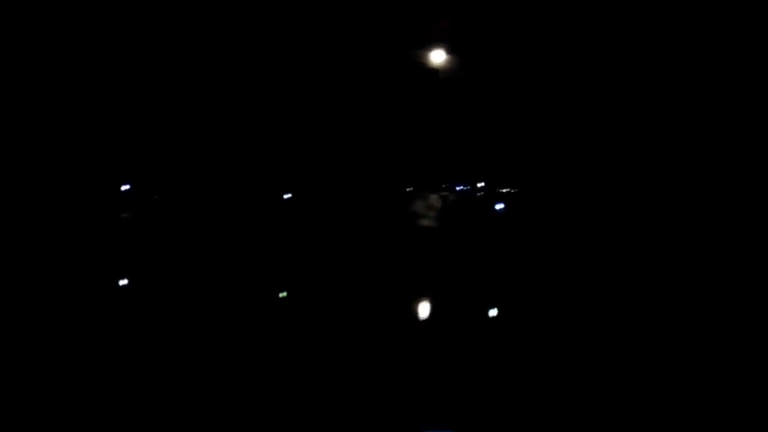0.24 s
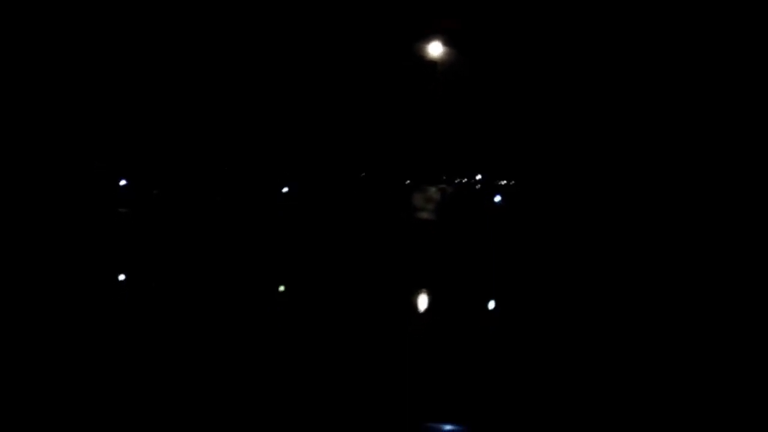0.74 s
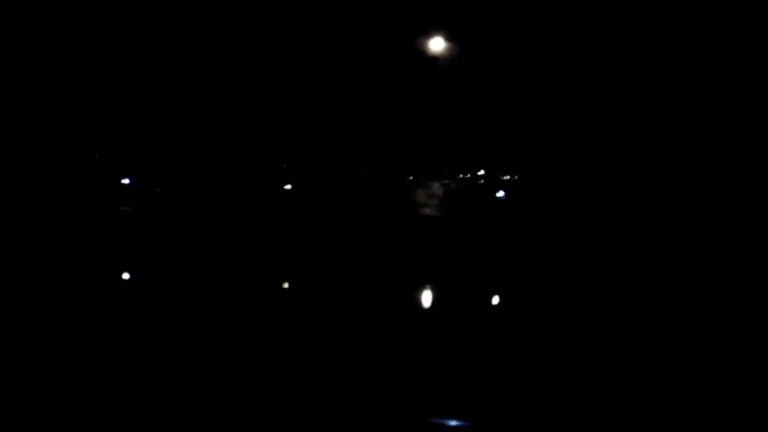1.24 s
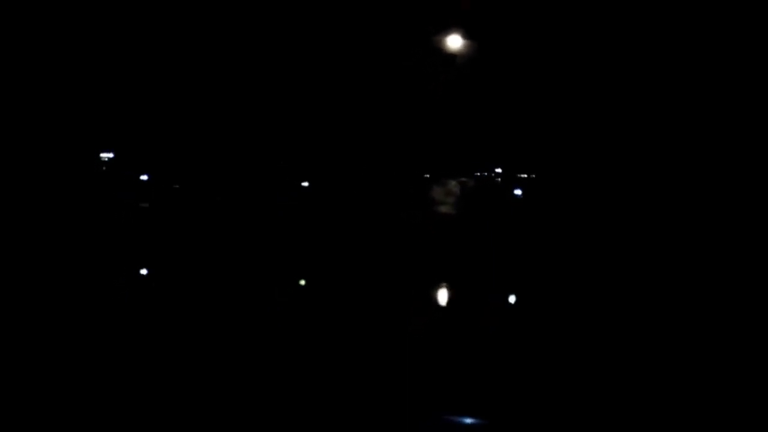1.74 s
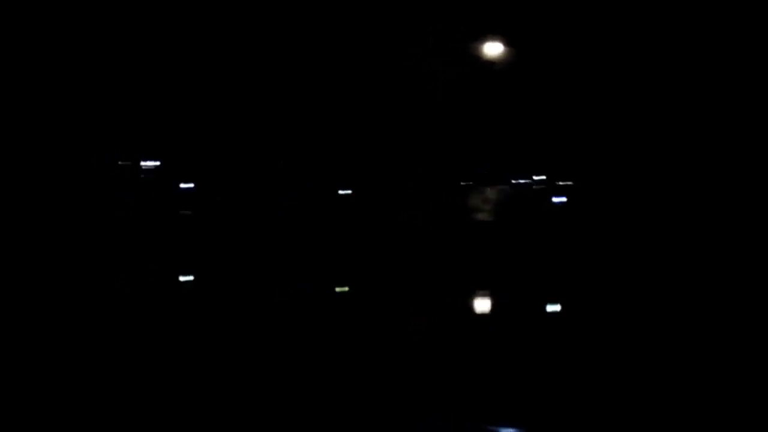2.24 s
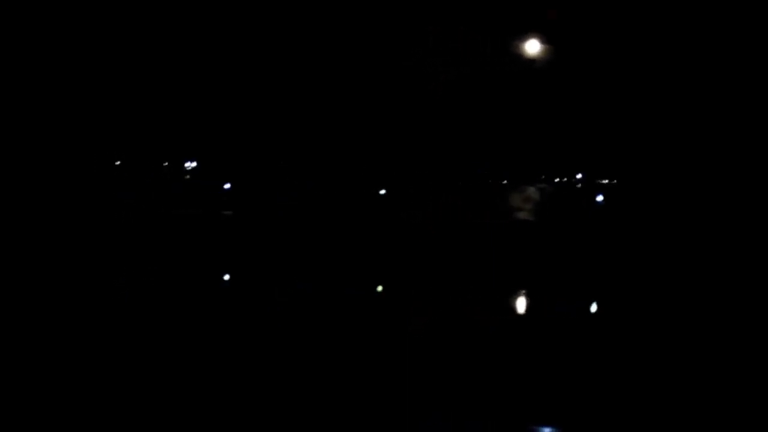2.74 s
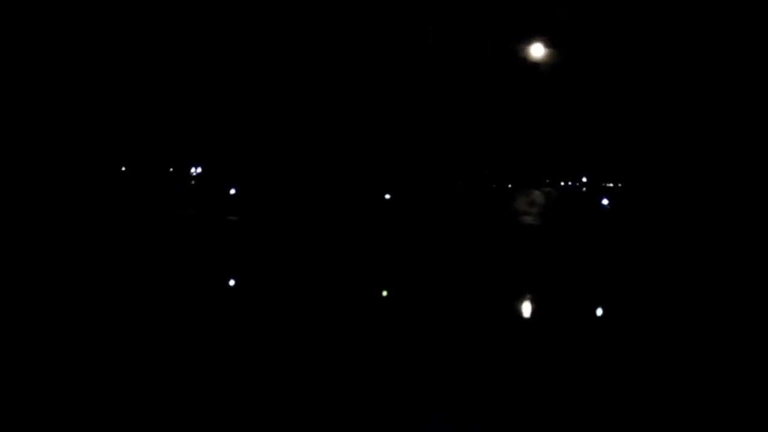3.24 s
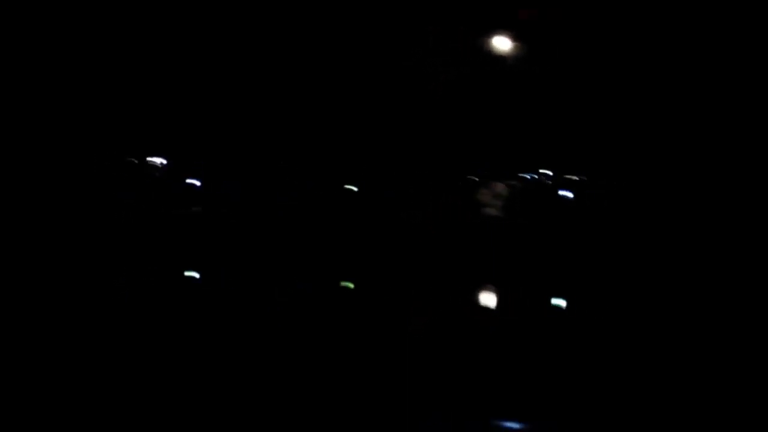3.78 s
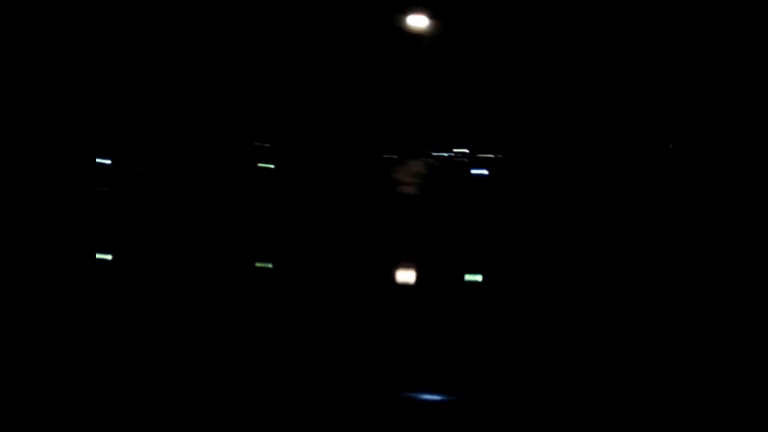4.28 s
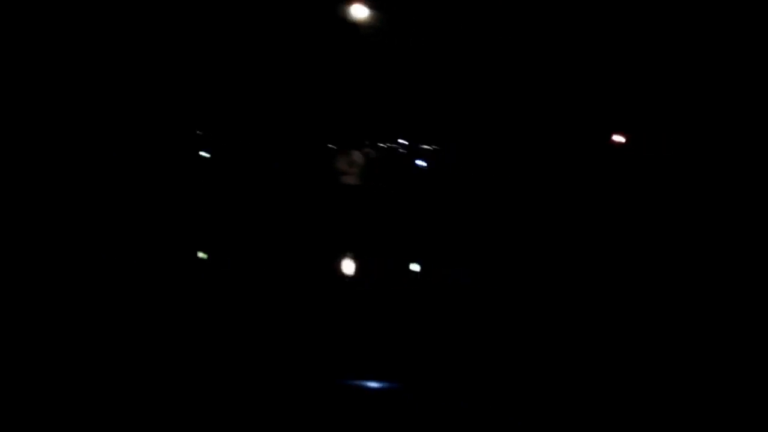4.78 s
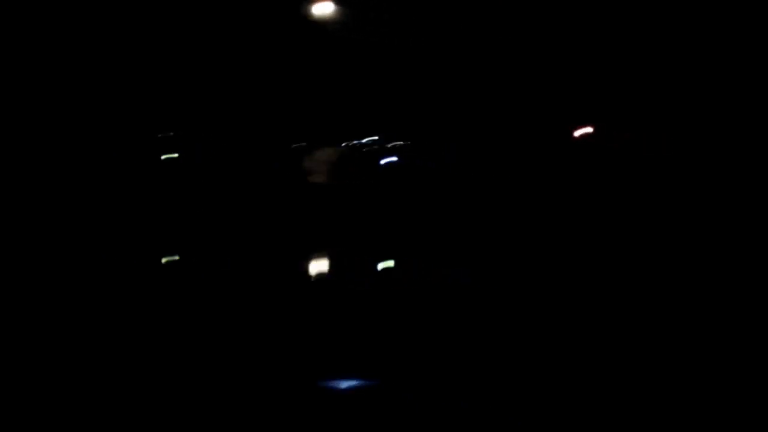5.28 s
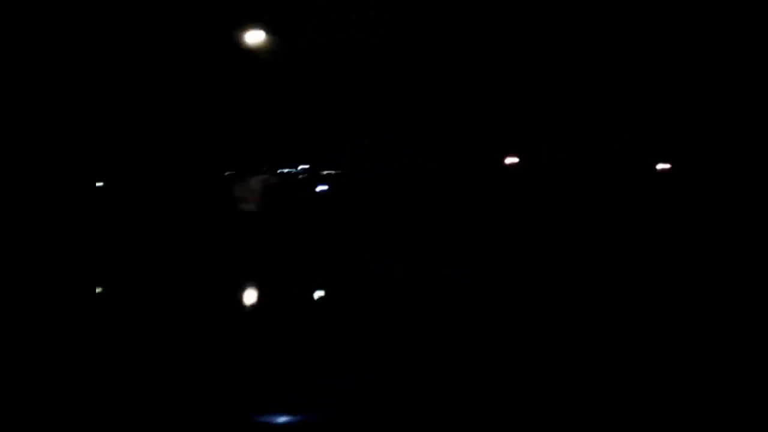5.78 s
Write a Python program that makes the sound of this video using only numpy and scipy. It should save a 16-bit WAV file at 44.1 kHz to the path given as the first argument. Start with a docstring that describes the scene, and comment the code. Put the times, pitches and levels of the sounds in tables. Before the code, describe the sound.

A colony of waterbirds, probably gulls, chatters continuously across open water at night, hundreds of short, high cries overlapping with a brief echo off the shore. For the first second or so the flock is fairly calm, with soft whimpers and mews. Thin squeals and shrill wails stand out from about 1.2 seconds, and hooked yelps join at 1.6. From about 2.5 to 4 seconds the chatter swells, full of quick rising yips and yelps. It eases for a moment around 4.2 seconds, then returns louder, with raspy squawks and sharp cries squabbling until the end at about 6 seconds. Two very faint low hoots lie beneath, near 1.4 and 3.2 seconds. Throughout there is the faint low rumble of a far town and the thin hiss and very high sizzle of a mono microphone.

```python
"""Waterbirds squabbling at night

A colony, probably gulls, chatters across open water and grows more excited. Single shrill, raspy
cries stand out, and the shore smears them with echoes. Each cry is a bending, shaking tone made of
four partials (1, 2, 3 and 4 times its pitch). Beneath lie faint hoots, the low rumble of a far town
and the thin hiss of a mono microphone."""
import sys
import numpy as np
from scipy import signal
from scipy.fft import rfft, irfft, next_fast_len
from scipy.io import wavfile

SR = 44100
rng = np.random.default_rng(int(sys.argv[2]) if len(sys.argv) > 2 else 0)


def dump(signal):
    """Clip the signal to [-1, 1] and save it as 16-bit WAV at the path in sys.argv[1]."""
    limited = np.clip(np.atleast_2d(signal).T, -1, 1)
    pcm = np.round(limited * 32767).astype(np.int16)
    wavfile.write(sys.argv[1], SR, pcm)


N = 265393
TIME = np.arange(N) / SR


def gain_of(db):
    """Turns decibels into a number to multiply a sound by."""
    return 10 ** (np.asarray(db) / 20)


def evened(x):
    """Scales a signal to an average strength (rms) of 1."""
    return x / np.sqrt(np.mean(abs(x) ** 2) + 1e-20)


def value_at(points, hz):
    """Reads between the rows of a (frequency, value) table, giving each octave equal room."""
    known_hz, values = np.transpose(points)
    return np.interp(np.log(hz + 1), np.log(known_hz + 1), values)


def add(mix, start_s, sound):
    """Adds a sound to the mix, dropping what sticks out at either end."""
    start = round(start_s * SR)
    sound = sound[..., max(-start, 0):]
    part = mix[..., max(start, 0):][..., :sound.shape[-1]]
    part += sound[..., :part.shape[-1]]


def wander(size, rate_hz):
    """A random wobble of strength 1, no faster than about rate_hz."""
    padded = next_fast_len(size + 2048)
    hz = np.fft.rfftfreq(padded, 1 / SR)
    keep_slow = np.exp(-.5 * (hz / rate_hz) ** 2)
    return evened(irfft(rfft(rng.standard_normal(padded)) * keep_slow, padded))[:size]


def coloured(x, spectrum):
    """Turns each frequency up or down by the decibels in a table."""
    padded = next_fast_len(N + 2048)
    gain = gain_of(value_at(spectrum, np.fft.rfftfreq(padded, 1 / SR)))
    return irfft(rfft(x, padded) * gain, padded)[:N]


def noise(spectrum):
    """Steady noise of strength 1, shaped by a table."""
    return evened(coloured(rng.standard_normal(N), spectrum))


def low_notes(rows, waver):
    """Soft low notes that swell and fade, their pitch a little unsteady."""
    out = np.zeros(N)
    for start_s, length_s, hz, db in rows:
        size = int(length_s * SR)
        phase = 2 * np.pi * np.cumsum(hz * (1 + waver * wander(size, 40))) / SR
        add(out, start_s, gain_of(db) * evened(np.hanning(size) * np.sin(phase)))
    return out


def cry(length_s, top_hz, scoop, drop, top_at, rasp, waver):
    """One bird's cry as four partials: the pitch rises, then falls, and rasp (0 to 1) roughens it."""
    # scoop and drop: how far below top_hz it starts and ends, as shares of that pitch
    # top_at: how far through the cry the pitch is highest; waver: the size of its slow wobble
    size = int(max(length_s, .03) * SR)
    progress = np.linspace(0, 1, size)
    roughness = np.sqrt(np.clip(rasp * (1 + .87 * (progress - .5)), 0, 1))  # the voice breaks at the end
    top_at = np.clip(top_at, .05, .95)
    rise = scoop * (1 - progress / top_at) ** 2
    fall = drop * ((progress - top_at).clip(0) / (1 - top_at)) ** 1.4
    hz = top_hz * (1 - np.where(progress < top_at, rise, fall))
    hz *= 1 + waver * wander(size, 45.4) + .026 * roughness * wander(size, 334)
    flutter = 1 + .26 * wander(size, 54)
    rattle = 1 + .91 * roughness * wander(size, 354)
    loudness = np.sin(np.pi * progress).clip(0) ** .27 * evened(flutter * rattle)
    phase = 2 * np.pi * (np.cumsum(hz) / SR + rng.random())
    return np.sqrt(2) * loudness * np.sin(np.arange(1, 5)[:, None] * phase)


def calls(rows, top_at, rasp, waver, partials_db):
    """Plays a table of cries in one kind of voice; each row's level is relative to the others."""
    out = np.zeros(N)
    for start_s, length_s, top_hz, scoop, drop, db in rows:
        partials = cry(length_s, top_hz, scoop, drop, top_at, rasp, waver)
        add(out, start_s, gain_of(db + np.array(partials_db)) @ partials)
    return out


def with_neighbours(rows, within_s=.05, pitch_spread=.06, fainter_db=10.5):
    """Each cry sets off two neighbours, a little later, fainter and at their own pitch."""
    replies = []
    for start_s, length_s, top_hz, scoop, drop, db in rows:
        for late, voice in rng.random((2, 2)):
            hz = top_hz * (1 + pitch_spread * (2 * voice - 1))
            replies.append((start_s + within_s * late, length_s, hz, scoop, drop, db - fainter_db))
    return list(rows) + replies


# The tone of the far town: frequency_hz, relative_db
RUMBLE_SPECTRUM = [(15, -2), (28, -19), (45, -8), (65, -1), (100, -0.5), (150, -2), (230, -1), (400, -4.5),
                   (700, -6), (1150, -6.5), (1600, -27), (2500, -56)]

def town_rumble():
    """A far town: low noise that heaves gently."""
    return gain_of(-61 + wander(N, 10.5)) * noise(RUMBLE_SPECTRUM)


# Soft swells of the town's drone: start_s, length_s, pitch_hz, level_db
DRONE_SWELLS = [(-.03, .16, 149, -62.5), (-.1, .5, 65, -71), (2.6, 1.4, 81, -72.5),
                (4.27, 0.15, 135.8, -65.5), (5.12, 0.13, 131, -65.5), (5.42, 0.13, 143.7, -62),
                (5.6, 0.23, 129.5, -64.5)]

def town_drone(level_db=-70, centre_hz=136, width_hz=22, heave_db=2.5):
    """A narrow band of distant rumble that heaves at random and now and then swells."""
    wobble = wander(N, width_hz) + 1j * wander(N, width_hz)
    band = evened((wobble * np.exp(2j * np.pi * centre_hz * TIME)).real)  # moved up to centre_hz
    return gain_of(level_db + heave_db * wander(N, 3.3)) * band + low_notes(DRONE_SWELLS, waver=.027)


# The tone of the hiss: frequency_hz, relative_db
HISS_SPECTRUM = [(800, -16.5), (1200, -13), (3000, -19), (8000, -15), (11500, -17.5), (13900, -15),
                 (16000, -9.5)]

def microphone_hiss():
    """The microphone's own thin, steady noise."""
    return gain_of(-56) * noise(HISS_SPECTRUM)


# The tone of the sizzle: frequency_hz, relative_db
SIZZLE_SPECTRUM = [(12500, -49), (13900, -22), (14500, -4), (15150, 8), (15900, -6), (16500, -20)]
# Faint electrical tones: pitch_hz, level_db
WHINE_TONES = [(6448, -71), (12897, -82)]

def microphone_sizzle():
    """A very high, fluttering sizzle with a steady electrical whine."""
    sizzle = gain_of(-53 + 1.5 * wander(N, 17)) * noise(SIZZLE_SPECTRUM)
    whine = sum(gain_of(db) * evened(np.sin(2 * np.pi * hz * TIME)) for hz, db in WHINE_TONES)
    return sizzle + whine


# The tone of the farthest birds: frequency_hz, relative_db
FAR_BIRD_SPECTRUM = [(900, -33), (1250, -11), (1750, 7.5), (2300, 8.5), (2700, -2), (3300, -29),
                     (3900, -23), (4500, 2.5), (5000, -8.5), (5700, 4), (6600, 4.5), (7400, 0),
                     (8500, -7.5)]

def far_birds():
    """Birds so far off that they blur into a flickering wash of noise."""
    return gain_of(-55 + 2.07 * wander(N, 17)) * noise(FAR_BIRD_SPECTRUM)


# The range of voices in the crowd: share_of_birds_lower, pitch_hz
CROWD_PITCHES = [(0, 1208), (.1, 1352), (.35, 1494), (.6, 1697), (.85, 1858), (1, 2175)]
# How excited the crowd is: time_s, above_calm_db
CROWD_EXCITEMENT = [(0, -1), (1.2, -0.1), (1.9, 1), (2.7, 5), (3.9, 5), (4.22, -2), (4.45, 6.5),
                    (4.62, 6.5), (4.8, 8), (5.3, 5), (6.02, 8)]

def crowd(count=420, spread_db=3, calm_db=(-57, -57, -57, -63.5), follow=(1, .92, .19, .21)):
    """Hundreds of overlapping cries; each partial rises from calm by its own share of the excitement."""
    partials = np.zeros((4, N))
    for k, (when, voice, length, near, rasp, top_at) in enumerate(rng.random((count, 6))):
        hz = np.interp(voice, *np.transpose(CROWD_PITCHES))
        sound = cry(.05 + .11 * length, hz, scoop=.08 * top_at, drop=.11 * (1 - top_at),
                    top_at=top_at, rasp=.73 * rasp, waver=.0091)
        start_s = (k + when) / count * (TIME[-1] + .15) - .15  # already calling as the scene opens
        add(partials, start_s, gain_of(spread_db * (2 * near - 1)) * sound)
    excitement_db = np.interp(TIME, *np.transpose(CROWD_EXCITEMENT))
    return sum(gain_of(db + share * excitement_db) * evened(partial)
               for db, share, partial in zip(calm_db, follow, partials))


# Mellow cries: start_s, length_s, top_pitch_hz, scoop_share, drop_share, level_db, rasp_0_to_1
MEW_CRIES = [(-.04, 0.068, 1683, .01, 0.055, -59, 0.24), (.2, 0.17, 1840, .013, .046, -55.5, .25),
             (1.193, 0.087, 1298, 0.027, .02, -50, 0.1), (1.769, .14, 1905, 0.025, 0.053, -58.5, 0.5),
             (2.03, .11, 2090, .024, 0.063, -54, .4), (2.136, 0.058, 1494, .012, .029, -55, 0.16),
             (2.35, 0.049, 1510, .01, .04, -54.5, 0.4), (2.638, .065, 1934, .025, 0.062, -49.5, .5),
             (2.69, .039, 1543, .018, 0.032, -50, 0.3), (3.044, 0.14, 2016, .016, 0.045, -55, 0.4),
             (3.17, .15, 1674, .01, 0.051, -53.5, .2), (3.34, 0.11, 1478, .011, .025, -54, 0.1),
             (3.601, .21, 1724, 0.016, .025, -50.5, 0.31), (3.791, .16, 1562, .008, 0.017, -51.5, 0.12),
             (3.945, .12, 1976, 0.063, .083, -50.5, 0.35), (4.38, .054, 1519, .023, .034, -56, 0.6),
             (4.62, 0.12, 1850, 0.014, 0.064, -47, .8), (4.651, 0.11, 1566, 0.012, 0.037, -55, 1),
             (4.681, .094, 2076, .023, 0.052, -54, .9), (4.92, .13, 1786, .014, .059, -50, 1),
             (5.217, .15, 1615, 0.026, .039, -49.5, 0.44), (5.35, 0.083, 1555, .012, .096, -48.5, 0.34),
             (5.67, 0.13, 2044, .073, .053, -54, 0.6), (5.761, 0.064, 1768, .008, 0.06, -51, .6)]

def mews():
    """Mews, strongest in the lowest partial; the later ones tend to be hoarser."""
    return sum(calls([row], top_at=.304, rasp=rasp, waver=.008, partials_db=(1.5, -34, -16, -15))
               for *row, rasp in MEW_CRIES)


# Soft cries: start_s, length_s, top_pitch_hz, scoop_share, drop_share, level_db
WHIMPER_CRIES = [(.205, 0.069, 1253, .004, 0.042, -56), (.27, 0.068, 1195, .003, .02, -55),
                 (.32, 0.066, 1175, 0.003, 0.01, -49.5), (.63, 0.077, 1200, 0.017, .03, -62),
                 (.89, 0.049, 1405, 0.025, 0.03, -58), (.97, 0.084, 1245, .01, 0.074, -61)]

def whimpers():
    """Smooth whimpers that peak early and then sink."""
    return calls(WHIMPER_CRIES, top_at=.24, rasp=.02, waver=.0035, partials_db=(-9, 2, -18, -31))


# Brief dips in the background: middle_s, half_length_s, depth_db
BACKGROUND_DIPS = [(.332, 0.013, -13), (1.448, 0.018, -24), (5.834, 0.02, -26)]

def dips():
    """A volume curve that sinks for an instant now and then."""
    return gain_of(sum(db * np.exp(-((TIME - middle_s) / half_s) ** 4)
                       for middle_s, half_s, db in BACKGROUND_DIPS))


# Thin cries: start_s, length_s, top_pitch_hz, scoop_share, drop_share, level_db
SQUEAL_CRIES = [(.75, 0.18, 1910, 0.028, 0.022, -63), (.86, 0.16, 1490, 0.0185, 0.043, -64),
                (1.25, 0.092, 1815, .02, .05, -56), (1.53, .1, 1777, .01, 0.072, -56),
                (1.62, 0.05, 1570, 0.023, 0.043, -55.5), (3.59, 0.064, 1826, 0.014, 0.016, -55),
                (3.8, 0.15, 1846, 0.022, 0.021, -57), (4.05, 0.073, 1530, 0.023, 0.075, -55),
                (4.3, 0.11, 1830, 0.0203, 0.054, -54.5), (4.85, 0.069, 1693, 0.053, .01, -52),
                (4.92, 0.11, 1860, 0.11, 0.035, -57), (5.1, 0.12, 1840, .05, 0.056, -55)]

def squeals():
    """Thin squeals, strongest in the third partial."""
    return calls(SQUEAL_CRIES, top_at=.47, rasp=.15, waver=.0094, partials_db=(-6, -11, 0, -22))


# Shrill cries: start_s, length_s, top_pitch_hz, scoop_share, drop_share, level_db
WAIL_CRIES = [(1.19, 0.046, 1795, .02, .005, -61), (1.235, 0.125, 1812, 0.008, 0.03, -53),
              (1.36, 0.09, 1735, 0.012, 0.027, -59.5), (1.495, 0.12, 1792, 0.0074, 0.028, -55.5),
              (1.985, 0.081, 1810, 0.0067, 0.0027, -50), (2.08, 0.11, 1803, .003, .004, -59),
              (2.53, 0.1, 1815, 0.04, 0.07, -54.5), (2.69, 0.076, 1810, 0.052, 0.025, -53),
              (3.295, 0.056, 1820, 0.012, .02, -54.5), (3.36, 0.12, 1894, 0.028, 0.039, -58),
              (3.8, 0.12, 1870, .025, 0.0067, -54), (3.98, 0.066, 1856, 0.014, 0.015, -50.5),
              (4.227, 0.181, 1857, 0.0256, 0.03, -55), (5.11, 0.071, 1870, 0.044, 0.038, -47),
              (5.2, 0.067, 1897, 0.026, 0.0097, -53), (5.67, 0.062, 1883, 0.058, 0.0092, -47.5),
              (5.735, 0.041, 1822, 0.0057, 0.023, -44.5), (5.76, 0.097, 2100, 0.037, 0.094, -50)]

def wails():
    """Clear, shrill wails that hold their pitch almost level."""
    return calls(WAIL_CRIES, top_at=.366, rasp=.04, waver=.007, partials_db=(-9, 2.2, -11.5, -17))


# Low calls from afar: start_s, length_s, pitch_hz, level_db
FAR_HOOTS = [(1.379, 0.11, 368, -65.5), (3.17, 0.23, 319, -64)]

def hoots():
    """Faint hoots, each a single soft tone."""
    return low_notes(FAR_HOOTS, waver=.012)


# Hooked cries: start_s, length_s, top_pitch_hz, scoop_share, drop_share, level_db
YELP_CRIES = [(1.61, 0.08, 1555, 0.014, 0.064, -47), (1.97, 0.15, 1465, 0.021, 0.043, -52.5),
              (2.136, 0.09, 1475, 0.015, 0.081, -50.5), (2.335, 0.12, 1463, 0.076, 0.053, -46),
              (2.465, 0.056, 1405, 0.019, 0.044, -45), (2.725, 0.072, 1630, .03, 0.042, -47.5),
              (2.785, 0.059, 1470, .01, 0.043, -45.5), (2.88, 0.049, 1412, 0.027, 0.066, -46),
              (2.98, .1, 1375, 0.014, 0.042, -52.5), (3.36, 0.16, 1537, 0.0274, 0.071, -48),
              (3.68, 0.059, 1484, 0.059, 0.014, -44), (3.72, .085, 1508, 0.029, 0.078, -44.5),
              (4.01, 0.14, 1560, 0.083, 0.09, -45), (4.13, 0.091, 1280, 0.02, 0.039, -50),
              (4.345, .135, 1505, 0.08, 0.12, -41.5), (4.69, 0.059, 1430, 0.028, 0.051, -51),
              (5.03, 0.089, 1374, 0.061, 0.065, -44.5), (5.13, 0.053, 1295, 0.015, .01, -48.5),
              (5.395, 0.12, 1478, .06, 0.1, -42), (5.5, 0.033, 1363, 0.0086, .05, -52),
              (5.78, 0.083, 1413, 0.027, 0.047, -47)]

def yelps():
    """Yelps that hook up and then fall, with neighbours joining in."""
    rows = with_neighbours(YELP_CRIES)
    return calls(rows, top_at=.354, rasp=.14, waver=.009, partials_db=(-14, 0, -16, -23))


# Harsh cries: start_s, length_s, top_pitch_hz, scoop_share, drop_share, level_db
SQUAWK_CRIES = [(1.62, .07, 1570, 0.023, 0.06, -59), (1.64, 0.13, 1300, 0.021, 0.025, -59),
                (1.71, 0.063, 1490, 0.027, 0.052, -65), (2.7, 0.1, 1480, 0.034, 0.039, -50),
                (3.102, .08, 1395, 0.017, 0.02, -53.5), (4.42, .09, 1780, 0.023, 0.068, -52.5),
                (4.674, 0.16, 1415, 0.039, 0.033, -47), (4.687, 0.1, 1840, 0.026, 0.023, -54),
                (4.72, 0.088, 2090, 0.016, 0.028, -58), (4.755, 0.079, 1646, 0.044, 0.041, -50),
                (5.41, 0.071, 2160, 0.022, .03, -52), (5.11, 0.1, 1597, 0.04, 0.026, -49),
                (5.47, 0.082, 1690, 0.042, 0.075, -51), (5.79, 0.22, 1730, 0.019, 0.013, -52)]

def squawks():
    """Squawks, made harsh by fast shaking of pitch and loudness."""
    rows = with_neighbours(SQUAWK_CRIES)
    return calls(rows, top_at=.537, rasp=.92, waver=.0117, partials_db=(-28, 2.5, -12.5, -39))


# Short cries: start_s, length_s, top_pitch_hz, scoop_share, drop_share, level_db
YIP_CRIES = [(2.62, 0.054, 1365, 0.077, .005, -40.5), (2.68, 0.046, 1550, 0.11, 0.0055, -46),
             (2.85, 0.027, 1693, 0.029, 0.0092, -46), (2.935, 0.038, 1410, 0.052, .005, -50),
             (2.97, 0.055, 1616, 0.03, .02, -49), (3.043, 0.043, 1577, 0.034, .005, -39.5),
             (3.065, 0.057, 1827, 0.069, 0.028, -44), (3.12, 0.042, 1514, 0.085, .005, -47),
             (3.16, 0.056, 1670, 0.067, .01, -52), (3.488, 0.05, 1657, 0.037, .01, -44),
             (3.805, 0.077, 1610, 0.11, .01, -46), (4.14, 0.054, 1643, 0.033, 0.017, -44.5),
             (4.475, 0.052, 1552, 0.087, 0.014, -46), (4.83, 0.057, 1540, 0.07, .01, -47),
             (4.909, 0.058, 1904, 0.044, .02, -39.5), (5.455, 0.063, 1890, .08, 0.012, -40),
             (5.555, 0.047, 1590, 0.048, .01, -50), (5.915, 0.047, 1920, 0.059, .05, -37.5),
             (5.975, 0.044, 1660, 0.083, .005, -52)]

def yips():
    """Quick yips that sweep up to a late peak."""
    rows = with_neighbours(YIP_CRIES)
    return calls(rows, top_at=.69, rasp=.12, waver=.008, partials_db=(-28, -2.8, -21, -23))


# How long the shore's echoes take to fade by 60 dB: frequency_hz, fade_s
ECHO_FADES = [(1000, 0.062), (3000, 0.5), (7000, 0.77)]

def shore(x, echo_share, echoes_per_s=2000, first_echo_s=.004):
    """The direct sound plus scattered echoes from water and banks; high notes linger longest."""
    clicks = rng.choice([-1., 1.], SR) * (rng.random(SR) < echoes_per_s / SR)
    clicks[:int(first_echo_s * SR)] = 0
    hz, delay_s, bands = signal.stft(clicks, SR, nperseg=256)
    fade = gain_of(-60 * delay_s / value_at(ECHO_FADES, hz)[:, None])
    tail = signal.istft(bands * fade, SR, nperseg=256)[1]
    echoes = evened(signal.fftconvolve(x, tail)[:N]) * x.std()
    return np.sqrt(1 - echo_share) * x + np.sqrt(echo_share) * echoes


# What the birds' throats and the night air let through: frequency_hz, gain_db
THROAT_AND_AIR = [(900, -14), (1250, -6), (1500, -1), (4300, 1), (4800, 2.5), (5400, 2), (6100, 1.5),
                  (6900, 0), (7800, -15), (10000, -21)]

def colony():
    """Drawn-out calls, sharp squabbling and the crowd, all echoing off the shore."""
    held = gain_of(1.5) * (mews() + wails() + squeals() + whimpers())
    birds = shore(held, echo_share=.38)
    sharp = gain_of(.28) * (yelps() + yips() + squawks())
    birds += shore(sharp, echo_share=.42)
    birds += shore(crowd(), echo_share=.23)
    return coloured(birds, THROAT_AND_AIR)


def scene():
    """Birds near and far over the town and the microphone's noise, alike in both channels."""
    mono = colony() + hoots() + town_drone()
    mono += dips() * (far_birds() + town_rumble() + microphone_hiss()) + microphone_sizzle()
    return np.array([mono, mono])


def record(dry, cutoff_hz=15800):
    """The recorder cuts off the very highest treble."""
    low_pass = signal.firwin(801, cutoff_hz, window=("kaiser", 9), fs=SR)
    return signal.oaconvolve(dry, low_pass[None], "same")


dry = scene()
out = record(dry)
dump(out)
```